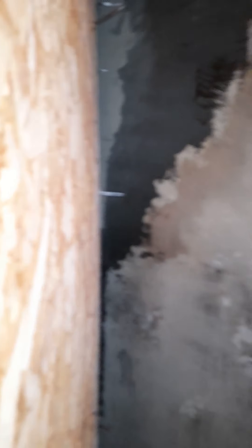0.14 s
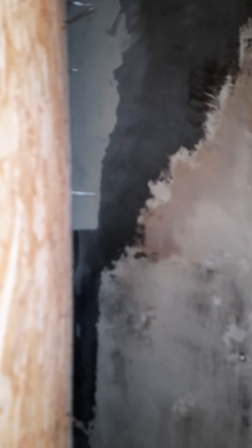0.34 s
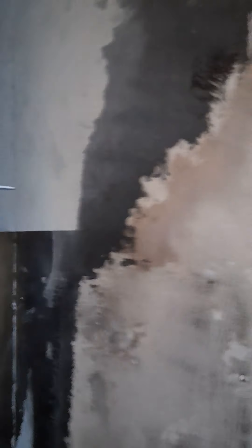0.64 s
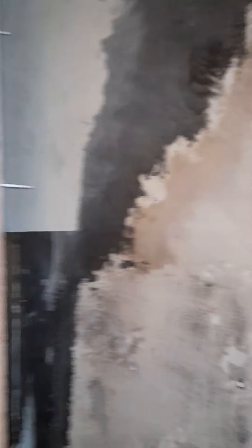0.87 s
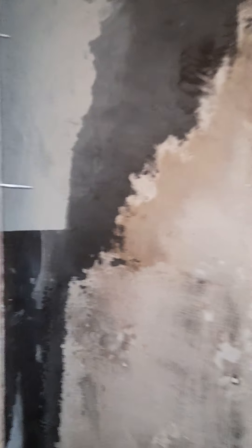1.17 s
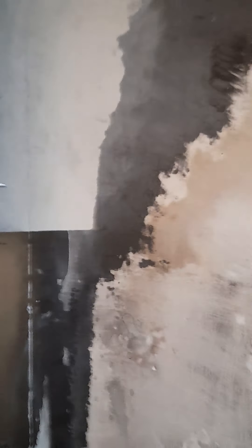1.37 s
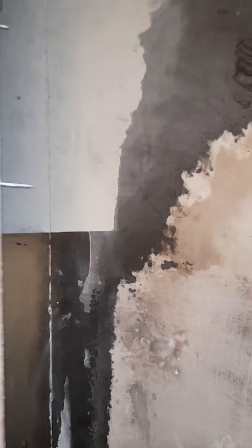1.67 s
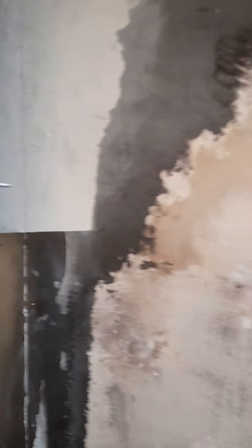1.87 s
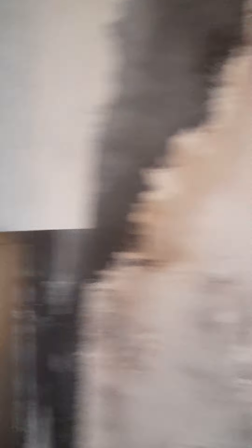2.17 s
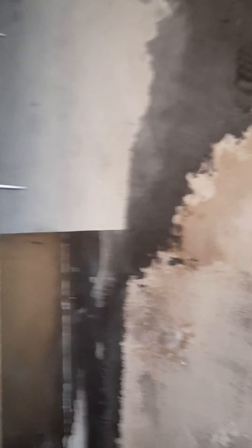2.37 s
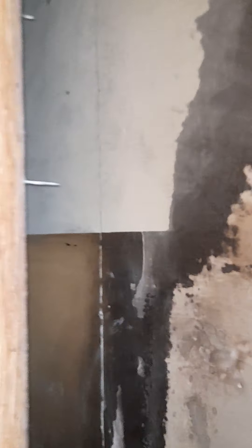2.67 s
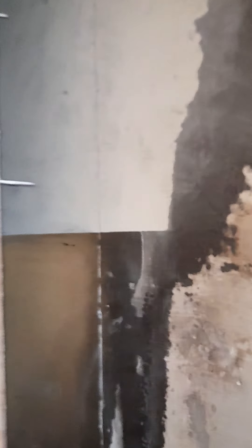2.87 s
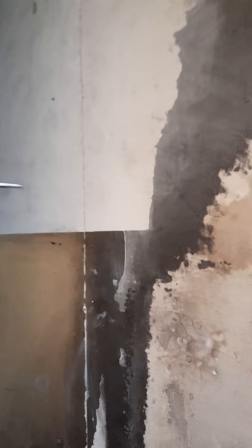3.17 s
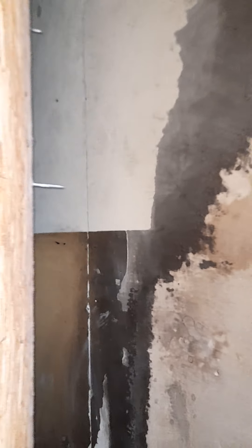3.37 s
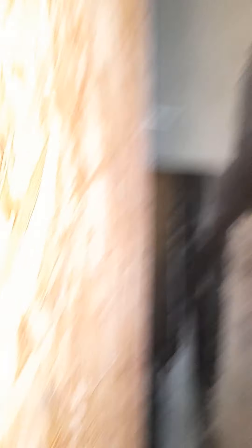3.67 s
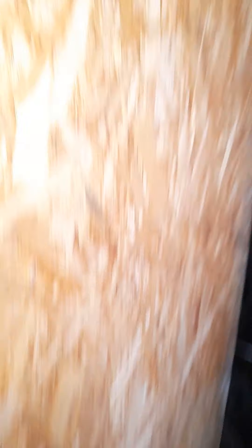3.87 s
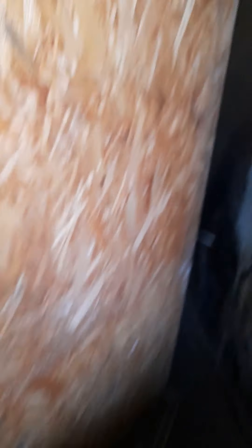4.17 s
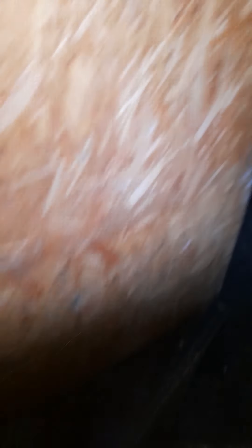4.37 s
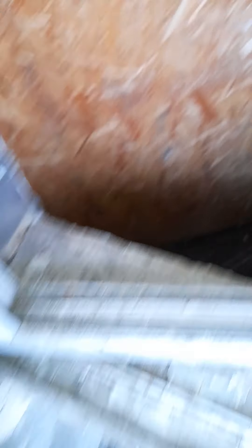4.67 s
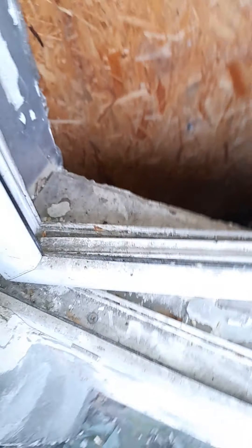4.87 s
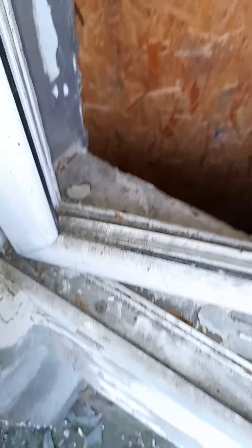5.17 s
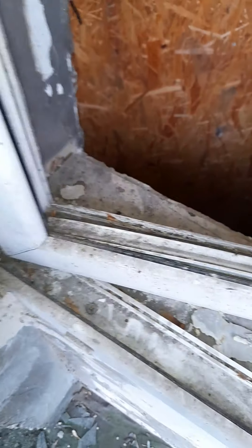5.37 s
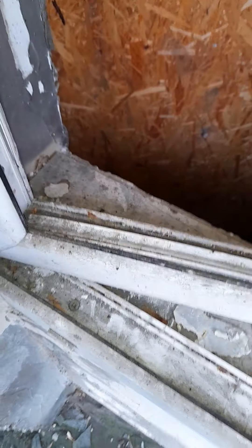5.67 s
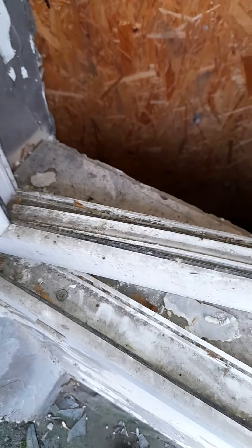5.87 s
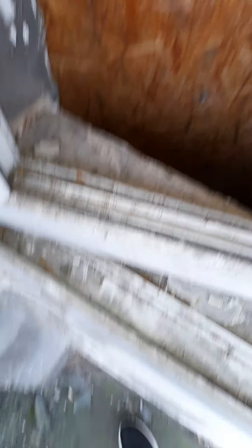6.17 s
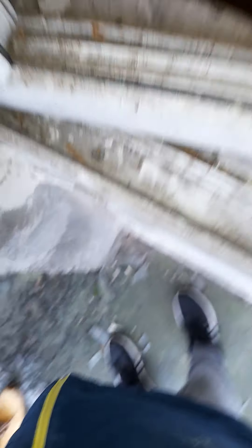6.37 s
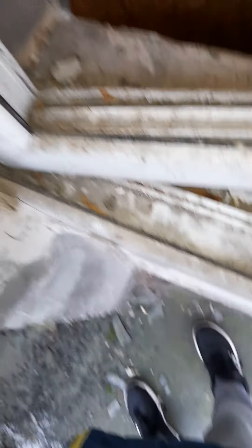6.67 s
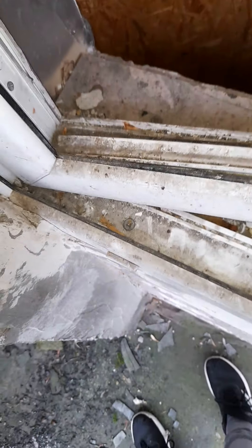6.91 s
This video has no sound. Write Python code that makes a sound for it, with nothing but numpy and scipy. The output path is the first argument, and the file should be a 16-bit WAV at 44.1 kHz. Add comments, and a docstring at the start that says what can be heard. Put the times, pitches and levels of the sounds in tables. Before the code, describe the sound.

Glass and grit crunch sharply, a wooden board bumps and scrapes, and clothing rustles as someone squeezes through a window.

```python
"""A loose chipboard panel knocks and judders, grit and glass shards crack, and clothes rustle as someone
squeezes through the window of an empty building, phone in hand. Bumps ring the panel's modes; dragging
drives them with dense soft slips. Each crack is a snap and a splintering burst that ring a shard.
The bare room rings on after bumps and cracks. Distant traffic hums in the window bay, swells low and
briefly near 4 s, and grows a little as the phone comes back outside."""
import sys
import numpy as np
from scipy import signal
from scipy.io import wavfile
from scipy.ndimage import uniform_filter1d

SR = 44100
rng = np.random.default_rng(int(sys.argv[2]) if len(sys.argv) > 2 else 0)


def log_audio(samples):
    """Write samples as a 16-bit WAV file to the path given in sys.argv[1]."""
    # one column per channel
    frames = np.atleast_2d(samples).T
    # limit to full scale, then quantise
    limited = np.clip(frames, -1, 1)
    pcm = np.round(limited * 32767).astype(np.int16)
    wavfile.write(sys.argv[1], SR, pcm)


N = 310464

# traffic spectrum shape: freq_hz, density_db
TRAFFIC_SPECTRUM = [(18, -35), (30, 1), (71, 7), (168, -7), (299, -2.5), (369, -9.5), (479, -9),
                    (606, -9.5), (1510, -18.5), (2690, -28.5), (6540, -32.5), (8280, -38), (15500, -74)]
# traffic at the phone: time_s, bass_db, low_mid_db, mid_db
TRAFFIC_LEVELS = [(0, -33.5, -40, -45.5), (1.1, -36, -45.5, -48), (2, -34.5, -49.5, -49.5),
                  (3, -38, -46, -45.5), (4.2, -34, -51, -43.5), (4.8, -35.5, -42, -41),
                  (5.4, -35.5, -42, -40), (6.2, -35.5, -44.5, -42.5), (7.04, -36.5, -42.5, -40.5)]
# traffic, left with right: freq_hz, correlation
TRAFFIC_CORRELATION = [(40, 0.95), (150, 0.93), (400, 0.82), (1000, 0.17), (8000, 0.017)]
# window bay resonances: centre_hz, width_hz, gain_db
BAY_RESONANCES = [(65, 8.8, -1.5), (261, 66, -5.5), (464, 26, 5), (602, 17.5, -2.5), (1008, 110, 0),
                  (1546, 760, 0), (1840, 110, -12)]
# rubbed grit resonances: centre_hz, width_hz, gain_db
GRIT_RESONANCES = [(2870, 2200, 3), (4300, 2400, -31), (6480, 1400, -2.5)]
# scraped wood resonances: centre_hz, width_hz, gain_db
WOOD_RESONANCES = [(930, 1100, 11), (2070, 800, 12)]
# rubbing strokes: start_s, rise_s, hold_s, fall_db_per_s, grit_db, cloth_rel_db, wood_rel_db
RUB_STROKES = [(0.078, 0.022, 0.031, 63, -71, -3, 22.5), (0.417, 0.063, 0.044, 205, -38.5, -13, 3.5),
               (.56, 0.014, .05, 200, -36.5, -10, -0.5), (0.65, 0.0079, 0.048, 232, -40.5, -13, 4),
               (0.775, .12, 0.097, 93, -51, -28, 1), (1.133, 0.013, 0.013, 160, -49.5, -9, 8),
               (1.226, 0.012, 0.022, 300, -40, -8, -7), (1.303, 0.013, 0.012, 397, -35, -5, 0.5),
               (1.328, .12, .04, 88, -38.5, -11.5, 0), (1.995, 0.12, 0.037, 100, -47.5, -6, -5),
               (2.139, 0.047, 0.028, 125, -33.5, -10, -3), (2.275, 0.019, 0.19, 100, -51, -9.5, -6),
               (2.547, .02, 0.1, 70, -51, -11, -20), (2.806, 0.067, 0.11, 100, -44, -6.5, -6),
               (2.974, 0.0053, 0.0045, 400, -28, -4.5, 2), (2.994, 0.041, 0.018, 200, -35.5, -13, -3),
               (3.084, 0.093, .02, 90, -44, -7.5, -18), (3.321, 0.0064, 0.012, 77, -46.5, -6, 0),
               (3.51, 0.24, 0.092, 300, -42, -8.5, -0.5), (3.868, 0.016, 0.053, 41, -53.5, -4.5, 2.5),
               (4.5, 0.053, .02, 49, -48, -5, -7), (4.66, 0.14, 0.053, 58, -47.5, -1.5, -0.5),
               (5.026, 0.041, .03, 70, -48, -5, 5), (5.523, 0.046, 0.033, 74, -50.5, -1.5, -18),
               (6.18, 0.08, 0.051, 55, -51, 0.5, 5.5), (6.647, 0.045, 0.065, 68, -54, -1.5, -16)]
# steady rustle under the strokes: grit_db, cloth_rel_db, wood_rel_db
STEADY_RUSTLE = (-59.5, -4.5, -2)
# grit and glass cracks: start_s, shard_peak_db, pitch_hz, upper_hz, upper_rel_db, top_rel_db, decay_ms
SHARD_CRACKS = [(0.098, -33, 1760, 6900, 10.5, -2, 2.3), (0.161, -28.5, 1477, 3400, -34, -29, 12),
                (0.379, -36, 1970, 5840, 3, -23, 11), (0.428, -30, 2890, 5920, 0, -2, 8.7),
                (0.4345, -26.5, 2110, 4660, 2, -12, 8.1), (0.472, -12.5, 1920, 5480, -10, -9, 23),
                (0.5045, -12, 2110, 3500, 6, -34, 3.8), (0.565, -24.5, 1950, 3580, 0.5, -13, 8.5),
                (0.6094, -33, 2020, 6000, -2, -20, 5.2), (0.662, -30, 1830, 4540, 8, -22, 8.9),
                (0.7088, -31.5, 2170, 4540, 4, -22, 11), (0.744, -41, 2200, 4500, 0, 10, 3),
                (0.8112, -35, 1940, 5020, 15.5, 9, 5.1), (0.883, -22, 1775, 4250, 7, -27, 8.5),
                (1.2387, -24, 1435, 3250, -9, -19, 6.7), (1.2537, -26.5, 3200, 6400, 7, -16, 11),
                (1.275, -27, 2160, 4540, 7.5, -16, 7.3), (1.3187, -22, 2220, 3430, 1.5, 4, 17),
                (1.4094, -22, 980, 4060, -16, -15, 14), (1.4527, -23, 2760, 3360, -5, -5, 19),
                (1.4684, -21.5, 2280, 4600, 2, 0, 13), (1.5176, -22.5, 2220, 4060, 0.5, -31, 7.7),
                (1.732, -52, 2190, 4400, 12.5, 20, 5), (1.8049, -44, 2243, 4600, 9.5, -3, 15),
                (1.8295, -29, 2170, 4370, 0.5, -29, 7.3), (1.9034, -39.5, 2300, 4370, 6, 6, 5),
                (2.0304, -33.5, 3400, 4600, -5, -6, 9), (2.065, -38, 3320, 5200, -6, 9, 5),
                (2.1347, -24.5, 1027, 5540, -4, -1, 30), (2.173, -22, 1920, 3460, -2, -6, 11),
                (2.1859, -16, 2950, 5200, 8, 2, 6), (2.2194, -31, 1780, 5000, 16, 1, 3.6),
                (2.2534, -20.5, 2230, 4700, 4, -31, 9.6), (2.449, -31, 2000, 4900, -2, -14, 7.5),
                (2.5329, -19, 2720, 4330, 8.5, -2, 9.8), (2.6753, -25, 1080, 4280, -22, -32, 11),
                (2.829, -24.5, 3145, 3280, 11, -3, 5.5), (2.8724, -27, 3230, 3480, -1, 4, 7.9),
                (2.9133, -27.5, 2320, 3530, 7.5, 0, 5), (2.9539, -26, 2380, 3480, 7, 3, 12),
                (2.9819, -14, 2040, 4550, 3, -18, 5.4), (3.0164, -28, 2060, 3730, 4, -4, 7.1),
                (3.0464, -16.5, 2570, 4250, 1, -2, 4.8), (3.1044, -32, 2580, 3680, -4, 6, 14),
                (3.1836, -20, 2120, 4880, 3, -4, 4.8), (3.286, -29, 2400, 3540, 6.5, -25, 8),
                (3.33, -12.5, 2120, 4350, -9.5, -5, 9.5), (3.5896, -31, 2750, 4900, 2, -8, 15),
                (3.6136, -27, 1910, 4900, -20, -13, 19), (3.6572, -22.5, 2590, 4440, -0.5, -26, 9.8),
                (3.7052, -30, 1870, 3400, -16, -23, 5.1), (3.7241, -17, 2830, 3330, -16, -31, 14),
                (3.8048, -28.5, 2970, 5150, 4, -24, 4.3), (3.8137, -26.5, 1630, 3350, 0.5, -22, 9.9),
                (3.848, -41.5, 2360, 4500, 2, 13, 19), (4.0896, -32.5, 2360, 5800, 5, -3, 5.1),
                (4.565, -45, 3250, 5200, 14, -11, 14), (4.78, -34, 2220, 3420, -6, 8, 5.4),
                (4.8016, -29.5, 2100, 3270, 7, -20, 6.1), (5.0894, -31, 1780, 5330, 0, -4, 11),
                (5.5936, -37, 1820, 3560, 1, -8, 8.5), (5.7194, -36, 1720, 5850, 1, -20, 10),
                (6.27, -37, 3270, 5000, 1, -10, 21), (6.4172, -43, 1720, 6790, 15.5, 9, 8.7)]
# whole-sheet modes of the panel: freq_hz, gain_db, t60_s
BOOM_MODES = [(64.5, -2.5, 0.27), (108, -6.5, 0.25)]
# bending modes of the panel: freq_hz, gain_db, t60_s
FLEX_MODES = [(121.1, -15.5, 0.51), (159.4, -5.5, 0.082)]
# body modes of the panel: freq_hz, gain_db, t60_s
BODY_MODES = [(135, -3, 0.056), (190, -21, 0.34), (256.6, -6.5, 0.053), (318.7, -1, 0.15),
              (372.4, 12, 0.018), (443, -2, 0.22), (530, 3.5, 0.071), (686, 4.5, 0.071), (962, 8.5, 0.041),
              (1296, -7, 0.2)]
# panel drags, then in the last row (4.026 s) a brief low swell of distant traffic rumble:
# start_s, rise_s, hold_s, fall_db_per_s, boom_db, flex_db, body_db
LOW_SWELLS = [(0.1, .005, 0.047, 114, -37, -24.5, -22.5), (0.465, 0.018, 0.014, 300, -36, -26, -21),
              (0.494, 0.0078, 0.018, 300, -12, -20, -15.5), (.535, .01, 0.053, 120, -21, -30, -30.5),
              (0.632, 0.037, .04, 250, -23, -32, -37.5), (0.806, 0.041, 0.017, 300, -33, -60, -40.5),
              (0.864, 0.027, .04, 108, -40, -37.5, -39.5), (1.118, 0.046, 0.028, 150, -36, -37, -40.5),
              (1.237, 0.0074, 0.014, 300, -18.5, -21, -23.5), (1.29, 0.16, .02, 150, -27, -23.5, -27.5),
              (1.518, 0.015, 0.096, 603, -24.5, -49, -45), (2.131, .003, 0.076, 116, -44, -28.5, -29),
              (2.222, 0.029, 0.13, 500, -34, -43, -46), (2.673, .004, 0.011, 225, -20, -22, -22.5),
              (2.782, 0.02, 0.016, 90, -30, -52, -57), (3.544, 0.032, 0.092, 150, -54, -33, -35),
              (3.735, .04, 0.15, 300, -32, -34.5, -44), (4.026, 0.0071, .015, 300, -28, -52, -46)]
# bumps on the panel: start_s, knock_db, boom_db, contact_ms, left_minus_right_db
PANEL_BUMPS = [(0.097, -6.5, -36, 1.84, 5), (0.161, -1, -20.5, 2.95, -6.5), (0.505, -7.5, -23, 1.5, -18),
               (0.53, -16.5, -10.5, 2.06, -10), (0.57, -11, -26, 4.2, 4), (0.891, -18.5, -42, 2.04, -5),
               (1.242, -17, -23, 1.8, -9.5), (1.259, -18, -24, 1, -9), (1.409, -22, -27.5, 1.5, -15),
               (1.457, -38, -21.5, 9.9, -29), (1.521, -36, -25, 3, -17), (2.134, -24, -20.5, 1.85, 7),
               (2.186, -18.5, -42, 1, 2), (2.676, -24, -20.5, 1.04, 2), (2.699, -11.5, -29, 2.66, -1),
               (2.98, -27, -40, 1.24, -4), (3.044, -24, -53, 1, 5), (3.723, -24, -26, 3.1, 2)]

ROOM_LOW_DB, ROOM_LOW_T60_S = -14, 0.69
ROOM_HIGH_DB, ROOM_HIGH_T60_S = -10.5, 0.4
CRACK_LOW_DB, PRESSED_DB, LOW_DB_PER_OCTAVE = -12, 8.5, -4  # low mids: base, under panel, above 2 kHz
PORT_LAG_SAMPLES = 18  # the panel reaches the right microphone port later


def undb(db):
    return 10 ** (np.asarray(db) / 20)


def unit_rms(x):
    return x / np.sqrt(np.mean(x ** 2))


def unit_peak(x):
    return x / abs(x).max()


def band(x, hz, width_hz):
    """Resonant band-pass, gain 1 at the centre."""
    return signal.lfilter(*signal.iirpeak(hz, hz / width_hz, fs=SR), x)


def between(x, lo_hz, hi_hz):
    return signal.sosfilt(signal.butter(3, [lo_hz, hi_hz], "band", fs=SR, output="sos"), x)


def ring(x, modes, gains=None):
    """Damped modes driven by x."""
    out = 0
    for k, (hz, db, t60_s) in enumerate(modes):
        radius, angle = np.exp(-np.log(1000) / (t60_s * SR)), 2 * np.pi * hz / SR
        mode = signal.lfilter([0, np.sin(angle)], [1, -2 * radius * np.cos(angle), radius ** 2], x)
        out = out + undb(db) * (1 if gains is None else gains[k]) * mode
    return out


def smooth(x, samples):
    return uniform_filter1d(uniform_filter1d(x, samples), samples)


def wander(rate_hz):
    """Smoothed random steps, RMS 1."""
    hold = int(SR / rate_hz)
    steps = np.repeat(rng.standard_normal(N // hold + 1), hold)
    return unit_rms(smooth(steps, hold)[:N])


def grains(per_s, spread_db):
    """Random clicks, a few much larger; RMS 1."""
    clicks = (rng.random(N) < per_s / SR) * rng.standard_normal(N)
    return unit_rms(clicks * undb(spread_db * np.minimum(rng.exponential(size=N), 5)))


def envelopes(rows):
    """Rise, hold and fall of each row, summed as power; one amplitude envelope per level column."""
    t, power = np.arange(N) / SR, 0
    for start_s, rise_s, hold_s, fall_db_per_s, *levels_db in rows:
        rise = np.clip((t - start_s) / rise_s, 0, 1)
        fall = undb(-fall_db_per_s * np.clip(t - start_s - rise_s - hold_s, 0, None))
        power = power + np.outer(undb(levels_db), rise * fall) ** 2
    return np.sqrt(power)


def lag_right(x, samples=PORT_LAG_SAMPLES):
    return np.array([x, np.roll(x, samples)])


def place(out, start_s, sound, pan_db):
    """Add a stereo sound; pan_db is left minus right."""
    i = int(start_s * SR)
    sound = sound[:, :N - i]
    out[:, i:i + sound.shape[1]] += sound * undb([[pan_db / 2], [-pan_db / 2]])


def traffic():
    """Distant traffic: third-octave noise bands that swell together and flicker alone."""
    def lookup(table, hz):
        freqs_hz, values = np.transpose(table)
        return np.interp(np.log(hz), np.log(freqs_hz), values)

    layers, swell = np.zeros((3, 2, N)), wander(1)
    for hz in 30 * 2 ** np.arange(0, 9, 1 / 3):
        correlation = lookup(TRAFFIC_CORRELATION, hz)
        mid, side = (band(band(rng.standard_normal(N), hz, hz / 3), hz, hz / 3) for _ in range(2))
        pair = np.sqrt(1 + correlation) * mid + np.sqrt(1 - correlation) * np.array([side, -side])
        band_db = lookup(TRAFFIC_SPECTRUM, hz) + .7 * swell + 1.7 * wander(12)
        layers[np.searchsorted([130, 420], hz)] += undb(band_db) * pair  # bass, low mids, mids
    times_s, *levels_db = np.transpose(TRAFFIC_LEVELS)
    t = np.arange(N) / SR
    return sum(undb(np.interp(t, times_s, db)) * unit_rms(layer) for db, layer in zip(levels_db, layers))


def window_bay(x):
    """The bay adds its resonances to sound from outside."""
    return x + sum(undb(db) * band(x, hz, width_hz) for hz, width_hz, db in BAY_RESONANCES)


def bare_room(x):
    """Reflections off bare walls: a noise tail per port, the treble dying sooner."""
    t = np.arange(SR) / SR
    noise = rng.standard_normal((2, SR)) * np.clip(t / 0.0016, 0, 1)
    low = between(noise, 60, 1000) * undb(-60 * t / ROOM_LOW_T60_S)
    high = between(noise, 1000, 16000) * undb(-60 * t / ROOM_HIGH_T60_S)
    tail = undb(ROOM_LOW_DB) * low / np.linalg.norm(low[0])
    tail += undb(ROOM_HIGH_DB) * high / np.linalg.norm(high[0])
    return signal.fftconvolve(x.mean(axis=0)[None], tail)[:, :N]


def rubbing():
    """Friction noise of cloth, grit and wood; small stones each tick at their own pitch."""
    strokes = envelopes([(*timing, db, db + cloth_db, db + wood_db)
                         for *timing, db, cloth_db, wood_db in RUB_STROKES])
    db, cloth_db, wood_db = STEADY_RUSTLE
    grit_gain, cloth_gain, wood_gain = np.hypot(strokes, undb([[db], [db + cloth_db], [db + wood_db]]))
    shared = grains(1500, 1.0) + rng.standard_normal(N)
    friction = np.array([.5 * port + 1.9 * grains(1500, 1.7) + 2.54 * rng.standard_normal(N)
                         for port in lag_right(shared, 8)])
    grit, wood = (sum(undb(db + 1.5 * wander(50)) * band(friction, hz, width) for hz, width, db in table)
                  for table in (GRIT_RESONANCES, WOOD_RESONANCES))
    stones = unit_rms(sum(band(grains(60, 2.5), hz, hz / 14) for hz in np.geomspace(2300, 7200, num=14)))
    grit = unit_rms(between(grit, 2440, 6440)) + undb(-5.5) * lag_right(stones, 7)
    cloth = between(friction, 9000, 16000) * undb(2.5 * wander(40))  # catches and lets go
    wood = between(wood, 720, 2110)
    mix = grit_gain * unit_rms(grit) + cloth_gain * unit_rms(cloth) + wood_gain * unit_rms(wood)
    return undb(1.5 * wander(60)) * mix


def splinter_burst(t, decay_ms):
    """A snap, then ragged decaying noise, reaching the ports a few samples apart."""
    noise = rng.standard_normal((3, len(t)))
    flicker_db = 4 * rng.standard_normal(len(t) // 24 + 1).repeat(24)[:len(t)]
    burst = (.75 * noise[:2] + .65 * noise[2]) * undb(flicker_db) * np.exp(-1000 * t / decay_ms)
    burst[:, 0] += 8  # snap
    burst[1] = np.roll(burst[1], rng.integers(2, 5))
    return burst


def shard_cracks():
    """Grit and glass break: each burst rings its shard in narrow peaks on wider humps."""
    out, t = np.zeros((2, N)), np.arange(SR // 8) / SR
    drags = LOW_SWELLS[:-1]
    for start_s, db, hz, upper_hz, upper_db, top_db, decay_ms in SHARD_CRACKS:
        pressed = any(at_s <= start_s <= at_s + rise_s + hold_s for at_s, rise_s, hold_s, *_ in drags)
        low_db = CRACK_LOW_DB + PRESSED_DB * pressed + LOW_DB_PER_OCTAVE * max(np.log2(hz / 2000), 0)
        pan_db = 3.5 * rng.standard_normal()
        burst = splinter_burst(t, decay_ms)
        shard = band(burst, hz, hz / 16) + 1.2 * band(burst, hz, hz / 60)
        shard += .9 * band(burst, 1.14 * hz, hz / 40)
        shard += .38 * band(band(burst, hz, hz / 1.5), hz, hz / 1.5)
        upper = band(burst, upper_hz, upper_hz / 7) + .7 * band(burst, upper_hz, upper_hz / 35)
        upper += .25 * between(burst, .72 * upper_hz, 1.5 * upper_hz) + .18 * between(burst, 3200, 7600)
        top = between(burst, 9800, 15500) * (0.4 + np.exp(-t / .0025))  # dies first
        low = between(burst, 414, 950)
        parts = (shard, 0), (upper, upper_db), (top, top_db), (low, low_db)
        crack = sum(undb(rel_db) * unit_peak(part) for part, rel_db in parts)
        place(out, start_s, undb(db) * crack, pan_db)
    return out


def panel_drag_and_rumble():
    """Soft slips against the wall keep the panel's modes sounding; the last swell is traffic rumble."""
    def sustain(modes, grains_per_s):
        drive = smooth(grains(grains_per_s, 1.35), samples=16)
        return unit_rms(ring(drive, modes))

    boom = sustain(BOOM_MODES[:1], 292)
    flex = lag_right(sustain(FLEX_MODES, 294), 4 * PORT_LAG_SAMPLES)
    body = lag_right(sustain(BODY_MODES[1:], 798))
    side = 0.084 * sustain(BODY_MODES[1:], 800)
    boom_gain, flex_gain, body_gain = envelopes(LOW_SWELLS)
    bass = (boom_gain * boom + flex_gain * flex) * undb([[-1.2], [1.2]])
    return bass + body_gain * (body + np.array([side, -side]))


def panel_bumps():
    """A push shoves the air out and back, rings the panel's body and booms the whole sheet."""
    out = np.zeros((2, N))
    spots = rng.standard_normal((len(PANEL_BUMPS), len(BODY_MODES)))  # each spot has its own mode mix
    for (start_s, knock_db, boom_db, contact_ms, pan_db), spot in zip(PANEL_BUMPS, spots):
        pulse = np.hanning(int(contact_ms * SR / 1000))
        push = np.pad(pulse / pulse.sum(), (0, SR // 2 - len(pulse)))
        air = band(band(-push, 540, 930), 450, 1200)
        body = ring(push, BODY_MODES, np.sign(spot) * undb(spot))
        knock = unit_peak(air) + undb(-5.0) * unit_peak(body)
        bump = undb(knock_db) * knock + undb(boom_db) * ring(push, BOOM_MODES)
        place(out, start_s + 0.0013, lag_right(np.pad(bump, (0, PORT_LAG_SAMPLES))), pan_db)
    return out


def scene():
    """Stereo mix; only bumps and cracks excite the room."""
    hits = panel_bumps() + shard_cracks()
    background = undb(-3.5) * window_bay(traffic())
    return background + bare_room(hits) + panel_drag_and_rumble() + rubbing() + hits


def record(dry):
    """The phone drops the deepest bass, dips near 8 kHz at its ports, clips and cuts the top."""
    x = signal.sosfilt(signal.butter(4, 48, "high", fs=SR, output="sos"), dry) * undb([[-.45], [.45]])
    x = x - 0.59 * band(x, hz=8360, width_hz=3260)
    return signal.sosfilt(signal.ellip(10, .2, 70, 15700, fs=SR, output="sos"), np.clip(x, -1, 1))


dry = scene()
out = record(dry)
log_audio(out)
```